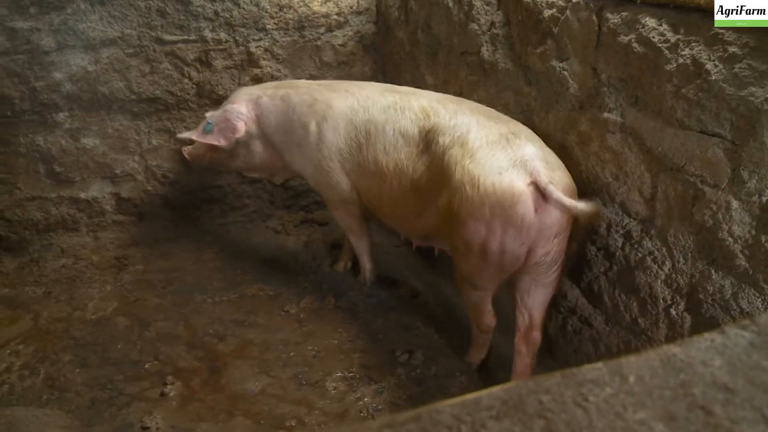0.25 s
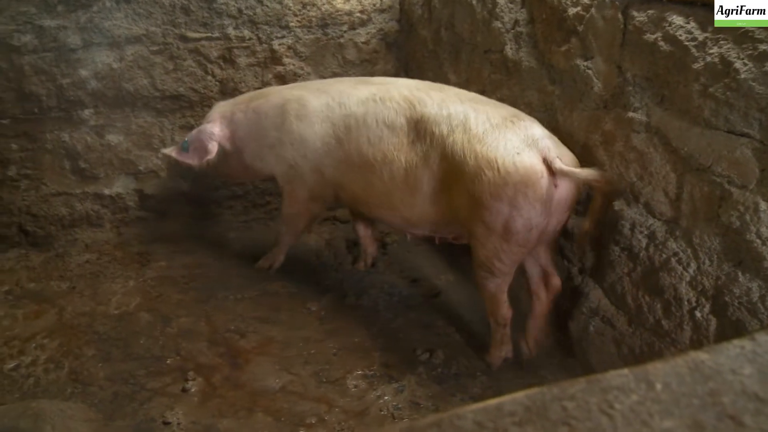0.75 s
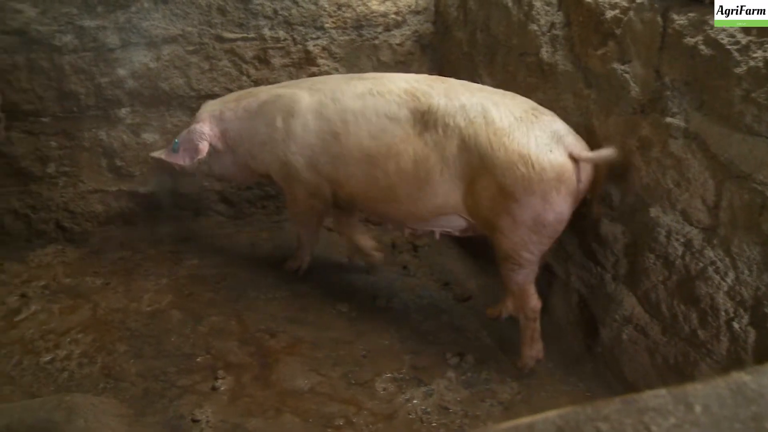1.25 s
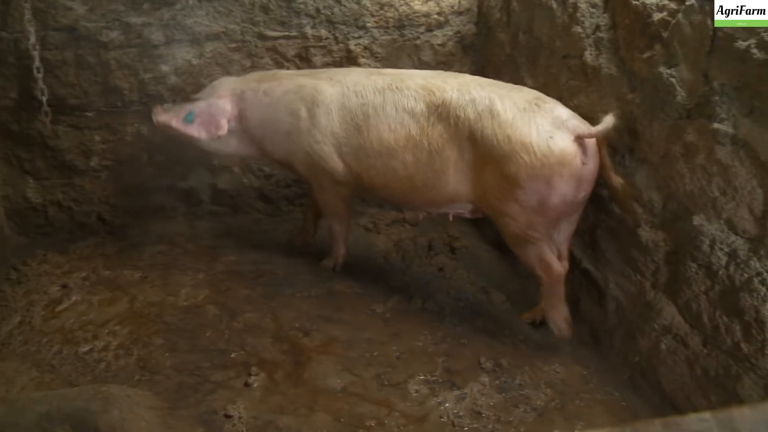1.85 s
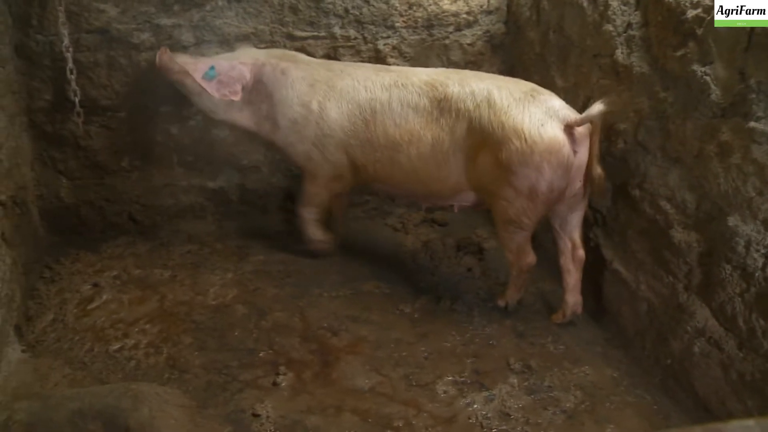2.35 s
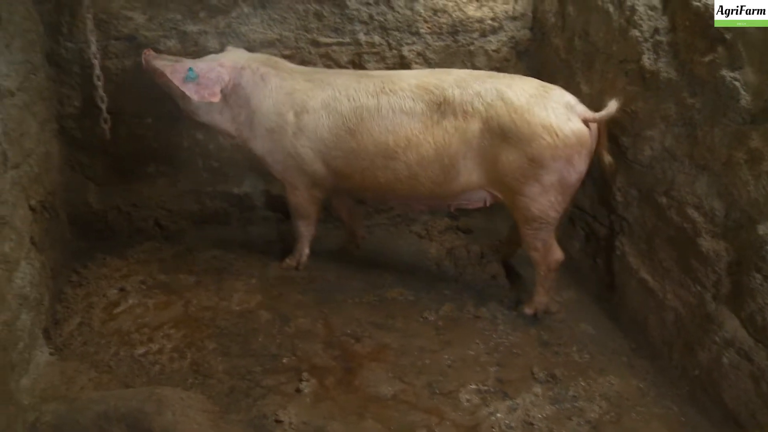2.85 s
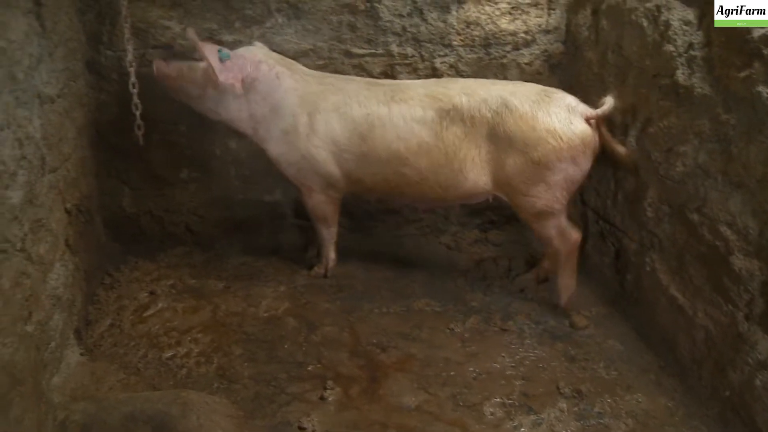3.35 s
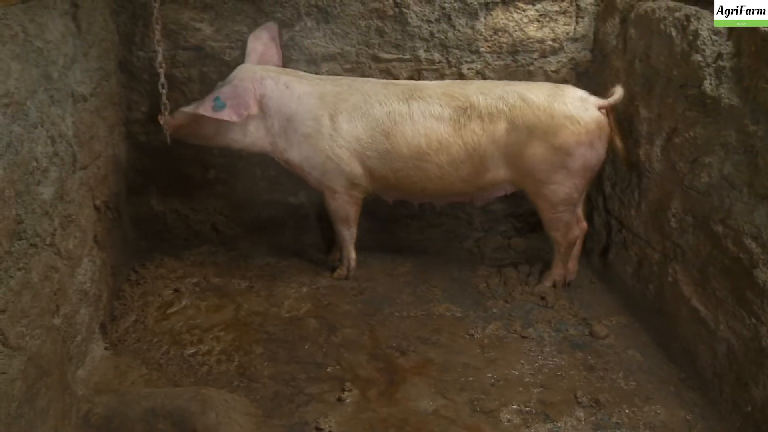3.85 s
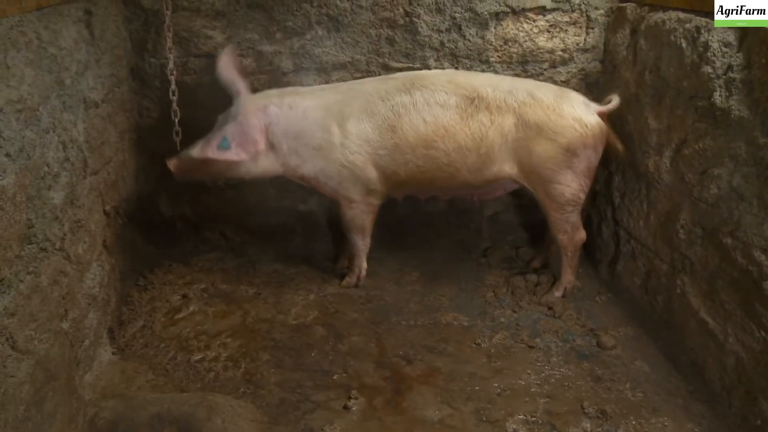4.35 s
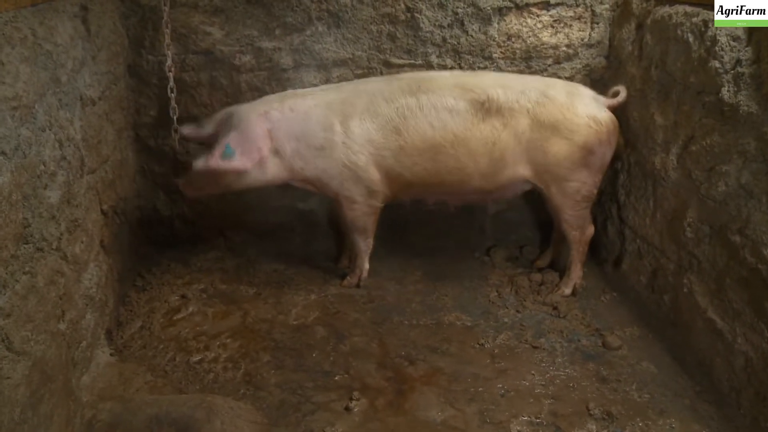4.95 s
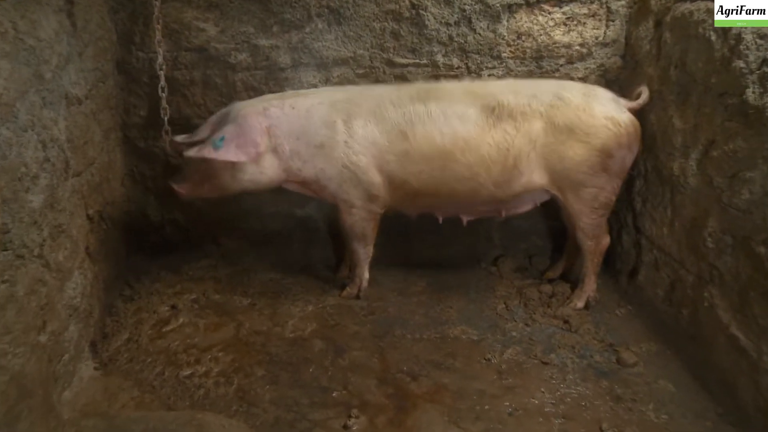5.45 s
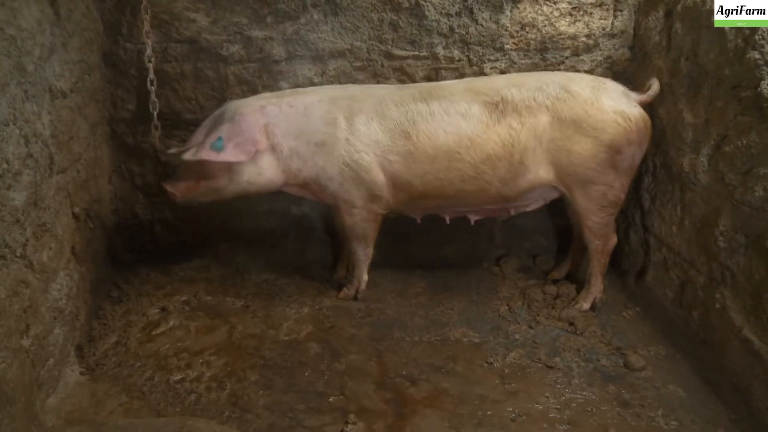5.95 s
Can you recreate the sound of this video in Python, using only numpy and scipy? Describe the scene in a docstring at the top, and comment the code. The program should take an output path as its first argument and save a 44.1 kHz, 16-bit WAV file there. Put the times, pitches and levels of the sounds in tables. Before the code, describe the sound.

Short, irregular pig grunts and snuffles with faint wet ticks, in a hard-walled pen with a steady low hum.

```python
"""A concrete pig pen in a shed: a pig grunts and snorts in short bursts, sniffing and scuffing between.
Its soft palate flaps a few dozen times a second, chopping the voice and the air in the snout, which
ring chest, throat, snout and nostrils. Wet ticks, hollow blips and a flickering hiss add the detail.
A lumpy low hum fills the shed, and the hard walls throw the pig's sounds back."""
import sys
import numpy as np
from scipy import signal
from scipy.io import wavfile
from scipy.ndimage import uniform_filter1d

SR = 44100
rng = np.random.default_rng(int(sys.argv[2]) if len(sys.argv) > 2 else 0)


def digitize_waveform(pressure):
    """Quantize a signal to 16-bit integers and store it at the path in sys.argv[1].

    Rows of a 2-D input are taken as channels; values are limited to [-1, 1].
    """
    field = np.atleast_2d(pressure).T
    bounded = np.clip(field, -1, 1)
    quanta = np.round(bounded * 32767).astype(np.int16)
    wavfile.write(sys.argv[1], SR, quanta)


N = 273420
TIME = np.arange(N) / SR


def amp(db):
    """Gain of a level in dB."""
    return 10 ** (np.asarray(db) / 20)


def unit_rms(x):
    """Scales to rms 1."""
    return x / np.sqrt(np.mean(x ** 2) + 1e-20)


def at_hz(points, hz):
    """Reads a table on a log-frequency axis."""
    f, value = np.transpose(points)
    return np.interp(np.log(hz + 1), np.log(f + 1), value)


def add(mix, start_s, sound):
    """Mixes a sound in at its start time."""
    part = mix[round(start_s * SR):][:len(sound)]
    part += sound[:len(part)]


def white(count):
    """White noise, cut from a strip at least a second long."""
    return rng.standard_normal(max(count, SR))[:count]


def wander(count, size):
    """Random drift of rms 1, smoothed twice over size samples."""
    return unit_rms(uniform_filter1d(uniform_filter1d(white(count), size), size))


def automation(rows, fade_s):
    """Turns timed breakpoints into a start time, a fade window and one curve a column."""
    s, *columns = np.transpose(rows)
    t = np.arange(max(s[0] - fade_s, 0), s[-1] + fade_s, 1 / SR)
    inside_s = np.minimum(t - s[0], s[-1] - t)
    no_fade_in = (s[0] <= 0) * (t < fade_s)
    fade = np.clip(inside_s / (2 * fade_s) + .5 + no_fade_in, 0, 1)
    return t[0], np.sqrt(fade), [np.interp(t, s, column) for column in columns]


def resonate(x, hz, width_hz):
    """A sweepable resonance of rms 1: shifts hz down to zero, smooths, shifts back."""
    carrier = np.exp(2j * np.pi * np.cumsum(hz * np.ones(len(x))) / SR)
    pole = np.exp(-np.pi * width_hz / SR)
    low = x / carrier
    for _ in range(2):
        low = signal.lfilter([1 - pole], [1, -pole], low)
    return unit_rms((carrier * low).real)


def patchy_noise(spectrum, patchy_db):
    """Coloured noise with louder and softer patches drifting through it."""
    frames, hz = N // 256 + 5, np.fft.rfftfreq(1024, 1 / SR)
    real, imag, patches = rng.standard_normal((frames, 513, 3)).T
    patches = unit_rms(uniform_filter1d(uniform_filter1d(patches, 12, axis=0), 8, axis=1))
    spectra = (real + 1j * imag) * amp(at_hz(spectrum, hz)[:, None] + patchy_db * patches)
    return signal.istft(spectra, nperseg=1024, noverlap=768)[1][:N]


# Colour of the room tone. Each row: frequency in Hz, relative level in dB.
WASH_SPECTRUM = [(12, -35), (20, -12), (76, 10), (104, -16.5), (158, -10.5), (418, -18.5), (794, -20),
                 (1350, -28.5), (2360, -29), (2860, -41.5), (3680, -41.5), (4730, -64), (8740, -47.5),
                 (10600, -46), (15700, -46)]
# The hum's two bands. Each row: centre in Hz, width in Hz.
HUM_BANDS = [(53, 7.8), (82, 13.5)]
# Fader moves of the hum. Each row: time in seconds, lower band in dB, upper band in dB.
HUM_LEVELS = [(0.0, -39.5, -51.5), (0.29, -57, -43), (0.48, -39, -46.5), (1.14, -59.5, -53),
              (2.78, -44.5, -45.5), (3.09, -63, -51.5), (3.35, -37.5, -42.5), (3.56, -66, -42),
              (4.3, -39, -49), (4.42, -70, -51.5), (4.52, -33, -33), (4.77, -41.5, -59), (4.96, -50, -40.5),
              (5.3, -40.5, -55), (5.42, -54, -39.5), (5.7, -42, -57), (5.73, -70, -40), (6.2, -42, -52)]


def shed(wash_db=-58.5):
    """Room tone: a steady wash and a lumpy hum of two narrow noise bands that swell and fade."""
    wash = patchy_noise(WASH_SPECTRUM, patchy_db=2.8)
    above_hum = signal.sosfilt(signal.butter(4, 130, "high", fs=SR, output="sos"), wash)
    out = amp(wash_db) * wash / np.std(above_hum)  # wash_db sets the part above the hum
    times, *levels = np.transpose(HUM_LEVELS)
    for (hz, width), db in zip(HUM_BANDS, levels):
        band = resonate(white(N), hz, width)
        steady = band / np.sqrt(uniform_filter1d(band ** 2, 9000) + 0.08)  # evens out deep beats
        out += amp(np.interp(TIME, times, db)) * unit_rms(steady)
    return out


# Decay of the pen. Each row: frequency in Hz, seconds to fall 60 dB.
PEN_DECAY = [(150, .45), (500, .35), (1100, .28), (2800, .25), (8000, .15)]


def pen_reverb(x):
    """Hard walls return dense reflections of random sign; the treble dies first."""
    taps = np.zeros(SR)
    slots = np.arange(200, SR - 20, 20)
    taps[slots + rng.integers(0, 20, len(slots))] = rng.choice([-1., 1.], len(slots))
    hz, t, spectra = signal.stft(taps, SR, nperseg=256)
    decay = amp(-60 * t / at_hz(PEN_DECAY, hz)[:, None])
    tail = signal.istft(spectra * decay, SR, nperseg=256)[1]
    return signal.fftconvolve(x, tail / np.linalg.norm(tail))[:N]


# Colour of the bright hiss. Each row: frequency in Hz, relative level in dB.
HISS_SPECTRUM = [(2350, -7.5), (4000, -4), (4480, -10.5), (6770, -12.5), (7460, -14), (8760, -20),
                 (10500, -12.5), (12300, -16), (13400, -20.5), (15700, -18.5)]
# The bed of hiss under the sniffs. Each row: time in seconds, level in dB.
HISS_BED = [(0.0, -95), (.6, -58.5), (1.2, -73.5), (1.5, -73.5), (2.0, -71), (2.5, -69), (3.3, -70.5),
            (4.2, -70.5), (5.1, -61.5), (5.5, -66), (6.2, -71)]


def bright_air(voice, grains_per_s=25, grain_s=0.0079, leak_db=-52.5):
    """Moving air: a flickering, gritty hiss that lifts with each sniff and escapes with the voice."""
    chance, height = rng.random((N, 2)).T
    grains = (chance < grains_per_s / SR) * 0.42 * height
    grit = signal.lfilter([1], [1, -np.exp(-1 / (grain_s * SR))], grains)
    bed = amp(np.interp(TIME, *np.transpose(HISS_BED)))
    leak = amp(leak_db) * abs(uniform_filter1d(voice ** 2, 900)) ** 0.27  # grows slower than the voice
    sniff = sniff_envelope(column=6, stretch=0.68)
    flicker = amp(wander(N, 150))
    hiss = unit_rms(patchy_noise(HISS_SPECTRUM, patchy_db=1.5))
    return (bed + sniff + leak) * flicker * (1 + grit) * hiss


# Wet ticks. Each row: start in seconds, relative level in dB, centre in Hz, seconds to fall 60 dB.
WET_TICKS = [(.95, -54, 11000, .05), (1.0878, -48, 5180, 0.045), (1.186, -57, 11000, .05),
             (1.332, -53, 6310, 0.058), (2.0014, -55, 10500, 0.071), (2.082, -49, 5000, 0.04),
             (2.135, -50, 10700, 0.11), (2.586, -49, 6490, 0.061), (3.044, -52, 11000, .05),
             (3.6012, -62.5, 5120, 0.054), (4.19, -59, 6000, 0.032), (4.628, -36, 9500, 0.041),
             (4.773, -43, 10700, 0.055), (4.8672, -50, 6400, 0.05), (5.3875, -49, 10700, 0.088),
             (5.691, -50, 7960, 0.1), (6.175, -42.5, 6450, 0.082)]


def wet_tick(db, hz, t60):
    """A crisp snap opens a broad burst of noise that dies away fast."""
    t = np.arange(SR // 5) / SR
    burst = resonate(rng.standard_normal(len(t)), hz, 7600)
    attack = 1 - np.exp(-t / 0.0004)
    snap = 1 + .4 * np.exp(-t / .0015)
    return amp(db - 8.5 - 60 * t / t60) * attack * snap * burst


# Hollow blips and squeaks. Each row: start in seconds, level in dB, pitch in Hz, length in seconds,
# noise width in Hz, clean share from 0 to 1.
HOLLOW_BLIPS = [(0.38, -36.5, 2170, 0.02, 300, 0.1), (0.385, -32, 732, 0.024, 110, 0.68),
                (1.175, -43, 816, 0.058, 80, 0.12), (1.582, -51.5, 122.8, 0.38, 21, 0.95),
                (1.711, -47, 2750, 0.063, 380, 0), (1.727, -51, 2430, 0.035, 250, .1),
                (2.011, -50, 815, 0.055, 70, 0.7), (2.179, -47, 2335, 0.072, 290, 0),
                (2.381, -53, 1694, .08, 60, 0.2), (2.4, -52, 3470, 0.023, 400, 0),
                (2.445, -41.5, 2300, 0.065, 350, 0.15), (2.445, -47, 3220, 0.054, 450, 0.04),
                (2.524, -46, 1550, 0.042, 450, 0.03), (2.948, -46, 1800, .02, 1500, 0.1),
                (3.199, -46, 762, 0.044, 60, 0.56), (3.461, -31, 587, 0.047, 40, 0.7),
                (3.493, -42, 1135, 0.031, 60, .5), (3.494, -44, 1290, 0.039, 90, 0.4),
                (3.498, -41, 945, .025, 60, 0.6), (3.51, -31, 510, 0.018, 60, 0.7),
                (3.455, -47, 1655, 0.038, 80, 0.57), (3.475, -45.5, 2330, 0.056, 180, 0.03),
                (3.538, -37.5, 522, 0.089, 40, 0.7), (3.879, -43, 1660, 0.071, 250, 0.1),
                (4.122, -40, 1090, 0.018, 200, 0.4), (4.184, -61, 6600, 0.046, 720, 0.2),
                (4.52, -57, 6330, 0.017, 140, 0.6), (4.454, -33, 1750, 0.012, 250, 0.3),
                (4.452, -39, 3250, .016, 300, .1), (4.5, -26, 2350, .016, 200, .3),
                (4.526, -31, 3290, 0.012, 250, 0.4), (4.63, -42, 7600, .009, 500, .3),
                (4.533, -33, 1540, 0.02, 50, 0.7), (4.55, -29, 1572, 0.023, 50, 0.8),
                (4.829, -27.5, 535, 0.041, 50, 1), (4.832, -24, 1090, 0.02, 120, 0.8),
                (4.829, -30, 325, 0.022, 60, 0.8), (4.862, -32.5, 509.5, 0.063, 50, 0.8),
                (4.864, -55.5, 6370, 0.059, 200, .3), (5.82, -56, 13300, 0.094, 1500, .05)]


def blip(db, hz, length_s, width_hz, clean):
    """A brief tone blurred by noise at the same pitch; quick attack, slower release."""
    t = np.arange(SR // 4) / SR
    tone = np.sqrt(2) * np.sin(2 * np.pi * hz * t)
    blur = resonate(rng.standard_normal(len(t)), hz, width_hz)
    envelope = (1 - np.exp(-t / (0.051 * length_s))) * np.exp(-2 * (t / length_s) ** 2)
    return amp(db) * envelope * (clean * tone + (1 - clean) * blur)


# Sniffs and scuffs. Each row: time of the peak in seconds, rise and fall in ms per 10 dB,
# then nostril hiss, rasp, dull body and bright hiss in dB.
SNIFF_CUES = [ (0.02, 58, 273, -60, -68, -49.5, -56.5), (0.236, 47, 106, -53, -52.5, -65, -57),
              (0.362, 25, 17, -63, -59, -44.5, -67), (0.52, 20, 40, -52, -50.5, -60, -69),
              (0.77, 88, 158, -55, -67, -51.5, -63), (0.98, 41, 59, -53.5, -62, -52, -62),
              (1.095, 11, 81, -51.5, -62, -53.5, -58.5), (1.181, 30, 97, -48, -54.5, -48.5, -51.5),
              (1.34, 20, 41, -82, -83, -57.5, -57), (1.54, 7, 84, -72, -65, -69.5, -75),
              (1.66, 102, 75, -59, -65, -55, -64.5), (1.727, 19, 35, -49.5, -74, -59.5, -68),
              (2.091, 30, 99, -57, -71, -54.5, -67), (2.194, 38, 35, -54, -59, -66.5, -54.5),
              (2.3, 66, 157, -61, -73, -57, -84), (2.587, 5, 58, -48.5, -64, -48, -59),
              (2.76, 122, 67, -57, -56.5, -52, -63), (2.85, 70, 56, -72, -80, -47, -77),
              (2.962, 16, 55, -48.5, -52.5, -45, -52.5), (3.05, 17, 20, -58, -75, -60, -60.5),
              (3.24, 55, 100, -61.5, -72, -65, -69.5), (3.43, 37, 39, -59.5, -76, -58, -77),
              (3.616, 24, 71, -45.5, -51.5, -45, -51.5), (3.804, 26, 32, -50.5, -80, -42.5, -64),
              (4.0, 60, 61, -57, -70.5, -56.5, -70), (4.34, 50, 148, -59.5, -75, -55, -63.5),
              (4.64, 73, 71, -49, -51.5, -42.5, -50.5), (4.785, 27, 37, -68, -78, -42.5, -63),
              (5.0, 61, 54, -62, -63.5, -47, -96), (5.35, 65, 96.5, -61, -70, -65, -77),
              (5.855, 55, 80, -48.5, -54, -42, -47.5), (6.04, 62, 50, -65, -63, -52.5, -67),
              (6.19, 122, 50, -48, -71, -49, -55), ]


def sniffs():
    """Air flickers through the nostrils: broad bands of hiss and rasp over a dull body."""
    high_air, low_air = rng.standard_normal((N, 2)).T * amp(2.0 * wander(N, 200))
    hiss = unit_rms(resonate(high_air, 2250, 565) + 2.3 * resonate(high_air, 1910, 1100))
    rasp = unit_rms(resonate(high_air, 3170, 1100) + 0.78 * resonate(high_air, 3625, 514))
    body = unit_rms(resonate(low_air, 202, 555) + 0.79 * resonate(low_air, 620, 1040))
    return sniff_envelope(3) * hiss - sniff_envelope(4) * rasp + sniff_envelope(5) * body


def sniff_envelope(column, stretch=1):
    """Gain of one sniff layer: each cue climbs, holds briefly and dies; stretch scales rise and fall."""
    t, cues = np.arange(0, N / SR + .002, .001), np.array(SNIFF_CUES)
    peak_s, rise_ms, fall_ms = cues.T[:3]
    late_ms = (t[:, None] - peak_s) * 1000
    past_hold_ms = np.maximum(late_ms - 0.08 * fall_ms, 0)
    loss_db = 10 * np.where(late_ms < 0, -late_ms / rise_ms, past_hold_ms / fall_ms) / stretch
    power = np.sum(amp(cues[:, column] - loss_db) ** 2, axis=1)
    return np.interp(TIME, t, np.sqrt(power))


# Clear moments of voice. Each row: start, rise, hold and fall in seconds, first and last pitch in Hz,
# then the first three partials in dB.
CLEAR_TONES = [(2.392, .005, .004, .008, 113, 125, -32, -54, -54),
               (2.42, 0.018, 0.018, .022, 169.8, 153, -32.5, -59, -48),
               (2.478, 0.0085, 0.01, .012, 166, 161, -38, -54, -49),
               (3.444, 0.024, 0.019, 0.011, 112.2, 125.5, -43, -47, -30.5),
               (3.455, .022, .02, .012, 111, 156, -31.5, -42, -58),
               (3.512, .006, 0.006, .006, 196, 185, -27, -40, -50),
               (3.53, .01, .008, .022, 151.3, 147, -32, -48, -46),
               (4.426, 0.027, 0.021, .015, 235.6, 268, -33, -35, -57),
               (4.49, .008, 0.0084, .008, 169, 182, -31, -52, -52),
               (4.518, .006, .01, .03, 201.4, 180, -30, -49, -34),
               (4.895, 0.016, 0.034, .039, 156, 135, -34.5, -36, -48),
               (6.054, .039, 0.034, .048, 221.7, 241.4, -43, -62, -52.5)]


def fold_tone(start, rise_s, hold_s, fall_s, first_hz, last_hz, *top_db):
    """The vocal folds swing evenly for a moment: three clean partials on a gliding pitch."""
    times = start + np.cumsum([0, rise_s, hold_s, fall_s])
    glide_hz = np.interp(times, times[[0, -1]], [first_hz, last_hz])
    ends_db = np.subtract(top_db, 6.5)
    rows = np.column_stack([times, glide_hz, [ends_db, top_db, top_db, ends_db]])
    start, fade, (hz, *levels) = automation(rows, fade_s=0.012)
    cycles = np.cumsum(hz * (1 + 0.013 * wander(len(hz), 300))) / SR
    partials = sum(amp(db) * np.sin(2 * np.pi * k * cycles) for k, db in enumerate(levels, 1))
    return start, fade ** 2 * np.sqrt(2) * partials


# Envelope of a grunt's layers. Each lists chest, throat, snout, nostril, rasp, palate flap.
LAYER_CLIMB = (0.65, 0.92, 1.36, 0.76, 1.3, 1.7)  # multiple of the grunt's climb
LAYER_SAG = (40, 55, 5, 20, 4.5, 47)  # loss in dB per second of hold
LAYER_FALL = (13.6, 23.3, 30, 18, 19.3, 22)  # loss in dB over the fall


def grunt_envelope(start, rise_s, hold_s, fall_s, climb_db, top_db):
    """Breakpoints of one grunt: each layer climbs, sags while held, falls and leaves a faint tail."""
    times = start + np.cumsum([0, rise_s, hold_s, fall_s, .6 * fall_s])
    onset_db = top_db - climb_db * np.array(LAYER_CLIMB)
    held_db = top_db - hold_s * np.array(LAYER_SAG)
    fallen_db = held_db - LAYER_FALL
    return np.column_stack([times, [onset_db, top_db, held_db, fallen_db, fallen_db - 28]])


# Thin upper rings of the snout. Each row: centre in Hz, width in Hz, dB relative to the throat.
SNOUT_RINGS = [(5200, 280, -38), (6150, 250, -49), (7400, 250, -50)]
# Grunts. Each row: start, rise, hold and fall in seconds, base climb in dB; faders in dB for chest and
# throat (both before voicing trims them), snout, nostril, rasp and flap; pitch in Hz, voiced share,
# flaps per second, flap depth, chest centre in Hz; centre and width in Hz for throat, snout and nostril;
# opening snort in dB, upward snout sweep and downward nostril and rasp sweep in shares per second.
GRUNT_CUES = [ (0.0, 0.0015, 0.02, 0.11, -17.5, -41.5, -38, -40, -41.5, -57.5, -38, 107.7, 0, 43, 0.2, 252, 530, 127, 1044, 183, 2210, 300, -2.5, -0.61, -0.19),
              (0.373, 0.0081, 0.16, 0.29, 6, -34.5, -41.5, -46.5, -46.5, -59, -38, 109.6, 0.16, 51, 0.37, 233, 675, 370, 1004, 350, 1910, 970, 0, 0.095, 0.25),
              (2.386, 0.049, 0.068, 0.071, 5.5, -34.5, -41.5, -49, -52, -52.5, -44, 163.7, 0.22, 31, 0, 172, 594, 200, 1003, 110, 2350, 350, -4, 0.044, 1.1),
              (3.437, 0.051, 0.052, 0.059, 17, -26, -30.5, -42, -60, -57.5, -53, 126, 0.58, 34.5, 0.07, 198, 537, 139, 980, 279, 2400, 230, -1, 0.37, -0.24),
              (3.825, 0.026, 0.062, 0.055, 5.5, -31.5, -44, -32.5, -47.5, -55, -34.5, 119.9, 0.24, 34, 0.2, 280, 537, 300, 1010, 83, 2320, 120, 7, 1.45, 0.026),
              (4.085, 0.047, 0.014, 0.017, 3.5, -36, -49, -47, -53, -58, -55, 115, 0.43, 30.4, 0.34, 187, 510, 122, 1100, 200, 2357, 75, 5, -0.13, 0.54),
              (4.152, 0.047, 0.0043, 0.087, 12.5, -34.5, -33.5, -44, -40.5, -41, -55, 119.2, 0.24, 25.3, 0.47, 268, 574, 161, 1193, 180, 1880, 410, 3, 0.35, 0.52),
              (4.428, 0.021, 0.069, 0.014, 26, -28, -34, -37, -38, -47, -53.5, 125.7, 0.42, 42, 0.3, 252, 542, 150, 990, 110, 1820, 464, 5, 0.32, 0.15),
              (4.497, 0.027, 0.006, 0.075, 8.5, -27, -27, -16.5, -32, -38.5, -32, 121.1, 0, 37.5, 0.6, 186, 546, 180, 1006, 54, 1617, 120, -2.5, 0.079, 0.15),
              (4.8, 0.04, 0.025, 0.14, 3, -29.5, -29, -29.5, -41, -55, -37.5, 111.1, 0.2, 31, 0.27, 286, 556, 82, 1146, 101, 2160, 220, 1, -0.35, 0.53),
              (5.038, 0.15, 0.03, 0.14, 9, -43, -44.5, -44, -45.5, -60.5, -56.5, 108.5, 0.05, 70, 0.36, 230, 507, 317, 1060, 534, 2210, 398, -5, -0.43, 0.076),
              (5.465, 0.009, 0.082, 0.0091, 10, -48.5, -46, -58.5, -55, -83, -59, 112, 0.24, 94, 0.5, 254, 535, 50, 1020, 280, 2410, 85, -1, 0.18, 0.47),
              (5.548, 0.0077, 0.029, 0.098, -2.5, -47.5, -60, -46.5, -49.5, -78, -46, 111.4, 0, 45, 0.23, 218, 493, 200, 944, 347, 2383, 109, 9.5, 0.41, 0.42),
              (5.679, 0.013, 0.043, 0.019, 9, -38, -35, -58, -51, -59.5, -35.5, 122.7, 0.02, 34, 0.5, 172, 503, 69, 1006, 200, 1640, 380, 0, 0.23, 0.4),
              (5.741, 0.053, 0.013, 0.082, 6, -33, -29.5, -30, -41.5, -60, -31.5, 120, 0.3, 41, 0.48, 211, 531, 91, 996, 71.5, 2227, 151, 4.5, 0, -0.39),
              (6.057, 0.055, 0.0093, 0.083, 30, -34, -36, -51, -51, -49, -34.5, 118.7, 0.36, 43, 0.26, 217, 483, 86, 1070, 890, 1960, 480, -5, 0.17, -0.064),
              ]


def grunt(cue):
    """Uneven fold pulses and turbulent air, chopped by the palate, ring chest, throat and nose."""
    rows = grunt_envelope(*cue[:5], top_db=np.array(cue[5:11]))
    pitch_hz, voiced, flaps_per_s, depth, chest_hz = cue[11:16]
    throat_hz, throat_width, snout_hz, snout_width, nostril_hz, nostril_width = cue[16:22]
    snort_db, sweep_up, sweep_down = cue[22:]
    start, fade, (chest_db, throat_db, snout_db, nostril_db, rasp_db, flap_db) = automation(rows, .002)
    count = len(fade)
    t = np.arange(count) / SR
    snort = amp(snort_db * np.exp(-(t / 0.029) ** 2))
    throat_gain = amp(throat_db) * snort
    snout_hz = snout_hz * (1 + sweep_up * t)
    sink = 1 - sweep_down * t

    fold_cycles = np.cumsum(pitch_hz * (1 + .15 * (1 - voiced) * wander(count, 500))) / SR
    pulses = np.diff(np.floor(fold_cycles), prepend=0) * amp(2.0 * white(count))
    flap_cycles = np.cumsum(flaps_per_s * (1 + 0.04 * wander(count, 1500))) / SR
    puffs = 1 - depth + 2.5 * depth * np.exp(-(flap_cycles % 1) / .4)  # one puff a flap
    gate = uniform_filter1d(puffs, 90)  # the palate takes a moment to open
    throb = uniform_filter1d(gate, 200)  # the open palate lets the snout ring out
    snout_cycles = np.cumsum(snout_hz * (1 + 0.018 * wander(count, 350))) / SR
    whistle = unit_rms(throb ** 1.2 * np.sin(2 * np.pi * snout_cycles))
    air = gate * unit_rms(white(count) * (1.06 + np.exp(-(fold_cycles % 1) / 0.32)))
    drive = gate * voiced * unit_rms(pulses) + (1 - voiced) * air  # feeds only the low resonances

    chest = resonate(drive, chest_hz, 192) + 0.29 * resonate(drive, 286, 180)
    chest += 0.84 * resonate(drive, 171, 82)
    throat = resonate(drive, throat_hz, throat_width) + .5 * resonate(drive, 637, 257)
    snout = unit_rms(np.sqrt(throb) * resonate(drive, snout_hz, snout_width))
    snout += .5 * resonate(drive, 1157, 540)
    snout += 75 / snout_width * whistle  # a narrow snout sings in the puffs
    nostril = resonate(air, nostril_hz * sink, nostril_width)
    nostril += 0.31 * resonate(air, 2360, 250) + 0.76 * resonate(air, 2040, 900)

    out = (1 - voiced) * amp(chest_db) * unit_rms(chest)
    out -= (1 - 0.82 * voiced) * throat_gain * unit_rms(throat)
    out += amp(snout_db) * unit_rms(snout)
    out -= amp(nostril_db) * snort * unit_rms(nostril)
    out += amp(rasp_db) * resonate(air, 3535 * sink, 650)
    out += throat_gain * sum(amp(db) * resonate(air, hz, width) for hz, width, db in SNOUT_RINGS)
    out += amp(flap_db) * np.sqrt(2) * np.sin(2 * np.pi * flap_cycles)  # the flapping itself pushes air
    return start, out * fade


def scene():
    """The mono mix: the pig up front, its reverb behind, over bright air and room tone."""
    voice = np.zeros(N)
    for cue in GRUNT_CUES:
        add(voice, *grunt(cue))
    for cue in CLEAR_TONES:
        add(voice, *fold_tone(*cue))
    pig = voice + sniffs()
    for start, *cue in WET_TICKS:
        add(pig, start, wet_tick(*cue))
    for start, *cue in HOLLOW_BLIPS:
        add(pig, start, blip(*cue))
    return (amp(-1.5) * pig + amp(-10.5) * pen_reverb(pig) + bright_air(voice) + shed())[None]


def record(dry):
    """A steep low-pass trims the very top of the treble."""
    low_pass = signal.firwin(1023, 15750, window=("kaiser", 9), fs=SR)
    return signal.oaconvolve(dry, low_pass[None], "same")


dry = scene()
out = record(dry)
digitize_waveform(out)
```